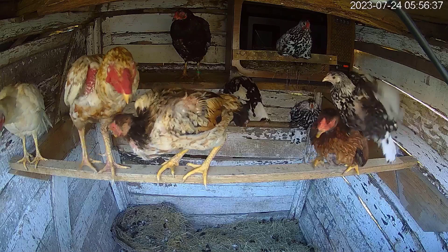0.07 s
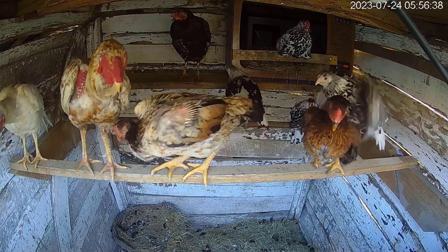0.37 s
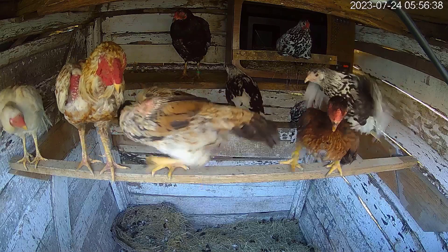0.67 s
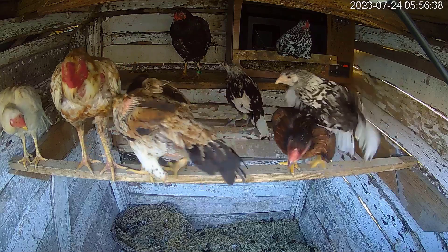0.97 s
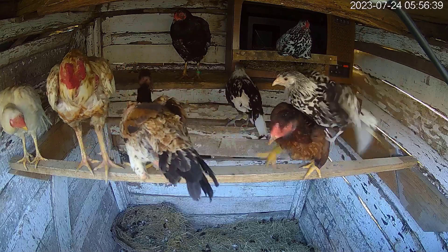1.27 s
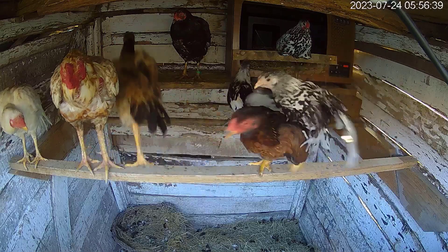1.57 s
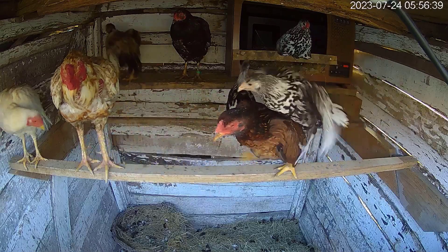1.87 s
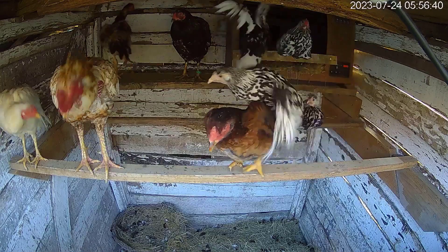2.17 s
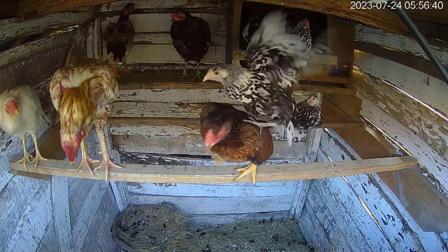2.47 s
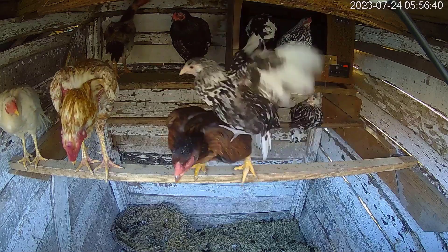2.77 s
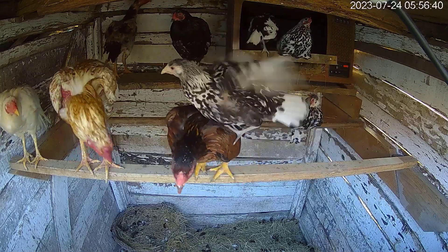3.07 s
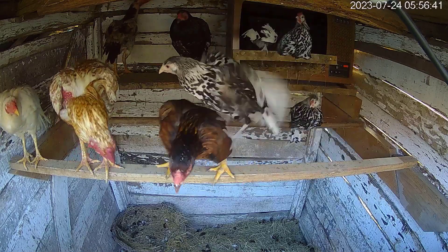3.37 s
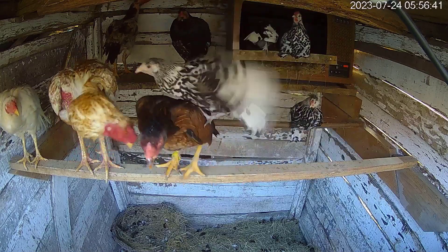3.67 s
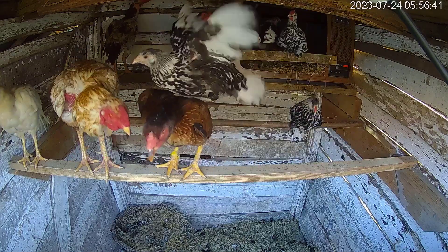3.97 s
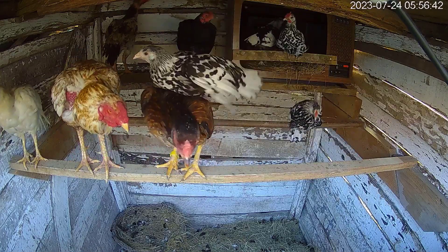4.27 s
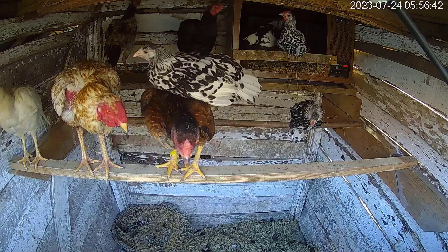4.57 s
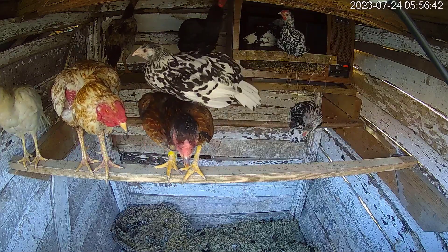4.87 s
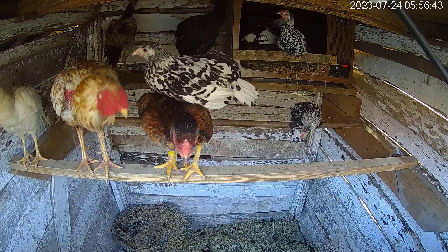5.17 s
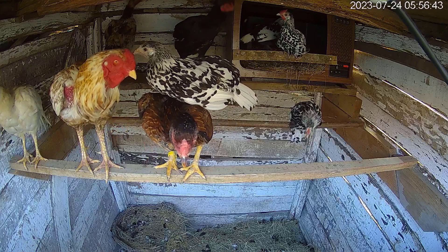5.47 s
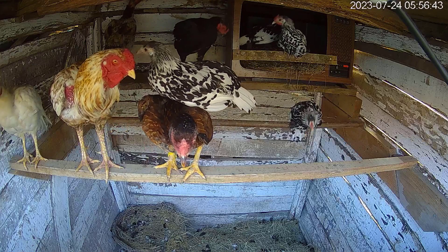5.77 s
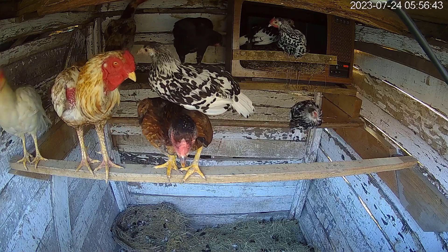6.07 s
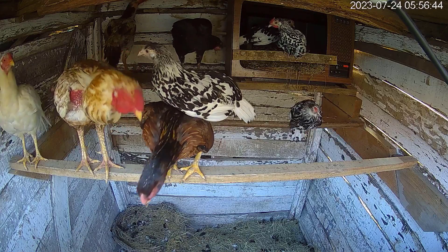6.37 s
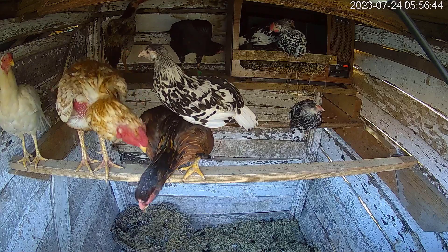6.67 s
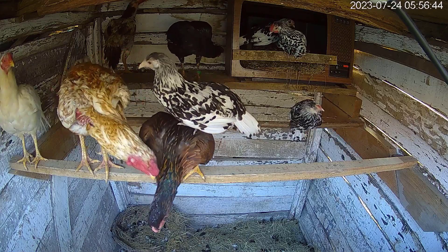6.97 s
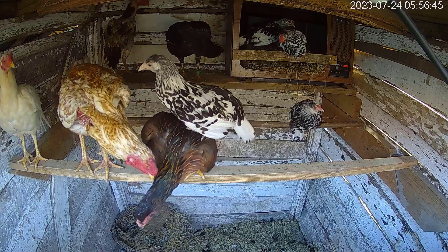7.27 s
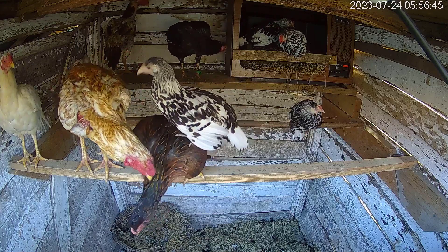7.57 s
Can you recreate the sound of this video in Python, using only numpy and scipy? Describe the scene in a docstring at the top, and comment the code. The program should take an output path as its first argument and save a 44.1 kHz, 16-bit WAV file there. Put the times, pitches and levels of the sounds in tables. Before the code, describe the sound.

Hens scuffle in a small wooden coop, flapping wings and knocking on a perch, with short clucks, one long squawk and soft whines.

```python
"""Feathers rustle, a foot knocks on a perch and a hen clucks: a scuffle in a small wooden coop.
One hen climbs onto another's back; her wings clap and swish, and their draught buffets a small microphone.
Claws and feet ring the wood. Clucks are syrinx pulses ringing the throat. The hen underneath protests
with soft whines and one long squawk, a high tone swept by a fast trill. Two thin squeaks slip in."""
import sys
import numpy as np
from scipy import signal
from scipy.fft import rfft, irfft
from scipy.io import wavfile

SR = 44100
rng = np.random.default_rng(int(sys.argv[2]) if len(sys.argv) > 2 else 0)


def int16_out(signal):
    """Quantize to a 16-bit WAV file."""
    q = np.round(np.clip(np.atleast_2d(signal).T, -1, 1) * 32767)
    wavfile.write(sys.argv[1], SR, q.astype(np.int16))


N = 336042
T = np.arange(N) / SR
FIRM_CALL_DB = -30   # reference for pitch, trill rate and brightness


def from_db(db):
    """Decibels to gain."""
    return 10 ** (np.asarray(db) / 20)


def rms_one(x):
    """Scale to unit rms."""
    return x / np.sqrt(np.mean(x ** 2) + 1e-20)


def wobble(t, per_s):
    """Random wander, spread about 1, per_s turns a second."""
    steps = rng.standard_normal(len(t))
    return np.interp((t - t[0]) * per_s, np.arange(len(t)), steps)


def coloured(x, spectrum, tilt_db_per_oct=0, ripple_db=0):
    """Filter by a spectrum with steep skirts, a tilt above 1 kHz and random ripple."""
    f = np.maximum(np.fft.rfftfreq(len(x), 1 / SR), 1)
    hz, db = np.transpose(spectrum)
    outside_oct = np.abs(np.log2(f / np.clip(f, hz[0], hz[-1])))
    db = np.interp(np.log(f), np.log(hz), db) - 24 * outside_oct
    db = db + tilt_db_per_oct * np.log2(np.maximum(f / 1000, 1)) + ripple_db * wobble(f, 1 / 190)
    return irfft(rfft(x) * from_db(db), len(x))


def noise(spectrum, size=N):
    """Coloured noise, unit rms."""
    return rms_one(coloured(rng.standard_normal(size), spectrum))


def resonance(x, hz, width_hz):
    """Two-pole resonance, unit peak gain."""
    r = np.exp(-np.pi * width_hz / SR)
    poles = [1, -2 * r * np.cos(2 * np.pi * hz / SR), r * r]
    return signal.lfilter(np.array([1, 0, -1]) * (1 - r * r) / 2, poles, x)


def ring(x, modes):
    """Parallel resonances."""
    return sum(from_db(db) * resonance(x, hz, width_hz) for hz, width_hz, db in modes)


def butter(x, order, hz, kind="low"):
    """Butterworth filter."""
    return signal.sosfilt(signal.butter(order, hz, kind, fs=SR, output="sos"), x)


def swell(peak_s, rise_s, fall_s, rounding_s=0):
    """Times and exponential envelope around a peak; rounding the top keeps the energy."""
    t = np.arange(-SR // 8, SR // 4) / SR
    span_s = np.maximum(np.where(t < 0, rise_s, fall_s), 1e-4)
    pointed = np.exp(-np.abs(t) / span_s)
    rounded = np.exp((rounding_s - np.hypot(t, rounding_s)) / span_s)
    return peak_s + t, rounded * np.linalg.norm(pointed) / np.linalg.norm(rounded)


def add(track, t, sound):
    """Mix a sound into the track at times t."""
    at = round(t[0] * SR) + np.arange(len(t))
    inside = (at >= 0) & (at < N)
    track[at[inside]] += sound[inside]


# vanes sliding over each other: (frequency [Hz], level [dB])
FEATHER_SPECTRUM = [(200, -27), (600, -9.5), (1100, -7.5), (1800, -0.5), (2600, -4), (3400, 0.5),
                    (4500, -2), (5800, 5.5), (7200, -5.5)]
# loose feathers: (time [s], level [dB])
RUSTLE_LEVELS = [(0, -58.5), (.9, -57), (1.1, -54.5), (2.2, -56.5), (2.9, -60), (3.3, -70), (3.9, -51),
                 (4.4, -86)]
def rustle(clump_db=7.5, clumps_per_s=22, flick_db=8, flicks_per_s=300):
    """Loose feathers flick against each other in random clumps."""
    flicks = rms_one(from_db(clump_db * wobble(T, clumps_per_s) + flick_db * wobble(T, flicks_per_s)))
    vanes = coloured(flicks * rng.standard_normal(N), FEATHER_SPECTRUM, tilt_db_per_oct=13)
    return from_db(np.interp(T, *np.transpose(RUSTLE_LEVELS))) * rms_one(vanes)


# stirred air: (time [s], level [dB])
DRAUGHT_LEVELS = [(0.0, -51), (0.1, -46), (1.65, -40), (2.9, -46.5), (3.15, -58.5), (7.37, -65), (7.6, -44)]
# its rumble: (frequency [Hz], level [dB])
DRAUGHT_SPECTRUM = [(20, 8), (33, -2), (48, -13.5), (70, -15), (130, -23.5), (260, -30.5)]
def draught():
    """Slow air from the wings rumbles on the microphone."""
    return from_db(np.interp(T, *np.transpose(DRAUGHT_LEVELS))) * noise(DRAUGHT_SPECTRUM)


# noise floor: (frequency [Hz], level [dB])
HISS_SPECTRUM = [(41, -32.5), (70, -6.5), (477, -7), (1060, -11.5), (2950, -12), (7200, -14)]
def hiss(level_db=-63.5):
    """Steady microphone noise."""
    return from_db(level_db) * noise(HISS_SPECTRUM)


# perch and boards: (frequency [Hz], width [Hz], gain [dB])
PERCH_MODES = [(130, 45, -4), (242, 39, -3.5), (312, 20, 1.5), (539, 17, 12.5), (610, 25, -4.5),
               (783, 28, 0), (1150, 42, 1.5), (1300, 110, -4)]
# shifting claws: (time [s], level [dB])
SHUFFLE_LEVELS = [(0, -64), (1.75, -60), (2.5, -62), (3.3, -76)]
def shuffle(clump_db=6, clumps_per_s=25, scratch_db=-15):
    """Claws scrape in uneven clumps and keep the wood ringing softly."""
    scrapes = rng.standard_normal(N) * from_db(clump_db * wobble(T, clumps_per_s))
    wood = ring(scrapes, PERCH_MODES) + from_db(scratch_db) * resonance(scrapes, 1300, 1800)
    return from_db(np.interp(T, *np.transpose(SHUFFLE_LEVELS))) * rms_one(wood)


# feet and bodies: (time [s], level [dB], twice the skid's fall [s], hardness [Hz], place on perch [0-1])
PERCH_KNOCKS = [(0.054, -42, 0.018, 1380, 0.29), (.21, -34, 0.024, 600, 0.44),
                (0.694, -42.5, 0.019, 280, 0.3), (0.91, -42, 0.023, 500, 0.26),
                (1.01, -44, 0.014, 1900, .21), (1.229, -28, 0.022, 610, .27),
                (1.242, -35, 0.087, 504, 0.37), (1.947, -21.5, 0.012, 1800, 0.23),
                (1.9597, -22, 0.0029, 700, 0.23), (1.975, -36.5, 0.018, 260, 0),
                (2.045, -32.5, 0.015, 1500, 0.24), (2.441, -41, 0.037, 400, 0.32),
                (2.883, -32, 0.012, 980, 0.17), (2.971, -55.5, 0.031, 280, .27),
                (4.998, -39.5, 0.0068, 1400, 0.12), (5.329, -58.5, 0.03, 420, 0.26),
                (5.5, -32.5, 0.0053, 740, 0.21), (5.788, -53.5, .018, 600, .21),
                (7.393, -42, 0.018, 1097, 0.37), (7.506, -42.5, 0.015, 2500, 0.5),
                (7.531, -44.5, 0.019, 400, 0.06)]
def knocks(scuff_db=5, all_skid_db=-41.5, blow_per_db=0.32, spread_db=2, thud_db=-13):
    """A foot skids, quiet ones with a single blow too; the place struck weights the wood's modes."""
    out = np.zeros(N)
    for peak_s, db, length_s, hardness_hz, place in PERCH_KNOCKS:
        t, envelope = swell(peak_s, rise_s=0.0041, fall_s=length_s / 2)
        skid = envelope * rng.standard_normal(len(t)) * from_db(scuff_db * wobble(t, 600))
        blow_share = np.clip(blow_per_db * (all_skid_db - db), 0, 0.5)
        blow = envelope == envelope.max()
        contacts = (1 - blow_share) * skid / np.linalg.norm(skid) + blow_share * blow
        contacts = butter(contacts, 2, hardness_hz)
        wood = from_db(thud_db) * resonance(contacts, 300, 600)
        for k, (hz, width_hz, mode_db) in enumerate(PERCH_MODES, 1):
            gain = np.sin(k * np.pi * place) * from_db(mode_db + spread_db * rng.standard_normal())
            wood += gain * resonance(contacts, hz, width_hz)
        add(out, t, from_db(db) * rms_one(wood) * np.sqrt(length_s * SR / len(t)))
    return out


# clucks: (time [s], level [dB], fall [s], lower formant [Hz], upper formant [Hz], upper gain [dB])
CLUCK_CALLS = [(0.126, -29.5, 0.015, 490, 1300, -1.5), (0.238, -29, 0.014, 503, 1090, -5),
               (0.718, -29.5, 0.0098, 516, 800, -1.5), (1.165, -32.5, 0.012, 567, 920, -3),
               (1.308, -31, 0.043, 476, 693, 6), (1.541, -26.5, 0.014, 497, 984, 3),
               (1.62, -27, 0.015, 570, 1312, -6), (2.57, -25, 0.01, 540, 957, -0.5),
               (2.669, -30.5, 0.014, 468, 850, 0.5), (2.881, -23.5, 0.014, 535, 926, -6),
               (3.059, -26.5, 0.013, 370, 850, 6), (3.12, -32.5, 0.0082, 505, 924, -4),
               (3.57, -32.5, 0.015, 847, 1330, -21), (5.516, -35, 0.012, 572, 885, 5),
               (6.227, -48, 0.0052, 873, 1202, 0.5), (6.72, -40.5, 0.0098, 524, 1030, 5)]
def clucks(firm_hz=276.1, hz_per_db=2.5, jitter=0.0791, shimmer_db=3, air=0.11, beak_db=-26, bend=0.048):
    """Uneven syrinx pulses ring the chest, two throat formants and, faintly, the beak."""
    out = np.zeros(N)
    for peak_s, db, fall_s, lower_hz, upper_hz, upper_db in CLUCK_CALLS:
        t, envelope = swell(peak_s, 0.52 * fall_s, fall_s)
        pitch_hz = firm_hz + hz_per_db * (db - FIRM_CALL_DB)
        cycles = np.cumsum(pitch_hz * (1 + jitter * wobble(t, pitch_hz))) / SR
        pulses = np.diff(np.floor(cycles), prepend=0) * from_db(shimmer_db * wobble(t, pitch_hz))
        syrinx = pulses + air * rng.standard_normal(len(t))
        throat = resonance(syrinx, lower_hz, 95) - from_db(upper_db) * resonance(syrinx, upper_hz, 110)
        chest_db = -13 - 7.5 * np.log2(lower_hz / 520)   # tight, high throat: quiet chest
        chest = from_db(chest_db) * resonance(syrinx, pitch_hz, 95)
        beak_hz = 2550 * np.exp(rng.standard_normal() / 10)
        voice = butter(throat - chest, 4, 1500) + from_db(beak_db) * resonance(syrinx, beak_hz, 290)
        # the opening beak bends the whole sound upward
        bent_s = t + 2 * bend * fall_s * np.log(np.cosh((t - peak_s) / (2 * fall_s)))
        add(out, t, from_db(db) * envelope * rms_one(np.interp(bent_s, t, voice)))
    return out


def stroke(t, tilt_db_per_oct, flutter_db=1, quills_per_s=520, snag_db=4.5, snags_per_s=130):
    """A run of tiny flicks passes between two feather groups, each with its own resonances."""
    flicks = rms_one(from_db(flutter_db * wobble(t, quills_per_s) + snag_db * wobble(t, snags_per_s)))
    groups = []
    for _ in range(2):
        friction = flicks * rng.standard_normal(len(t))
        groups.append(rms_one(coloured(friction, FEATHER_SPECTRUM, tilt_db_per_oct, ripple_db=6)))
    blend_rad = wobble(t, 70) / 2
    return np.cos(blend_rad) * groups[0] + np.sin(blend_rad) * groups[1]


# wings snap open or strike a body: (time [s], relative level [dB], fall [s], tilt [dB/octave])
WING_CLAPS = [(0.166, -20.5, 0.013, 1), (0.182, -21, 0.003, 2), (0.206, -28.5, 0.0098, -1),
              (0.335, -43, 0.022, 4), (0.483, -34, 0.044, -4), (0.896, -27.5, 0.0088, 7.5),
              (1.213, -17.5, 0.0057, -2), (1.523, -34, 0.018, 0.5), (1.725, -31, 0.017, -5),
              (1.783, -22.5, 0.0046, 7), (1.873, -30, 0.0055, 7), (2.039, -25, 0.011, -2.5),
              (2.143, -25, 0.011, 4.5), (2.336, -21, 0.014, -1), (2.764, -24.5, 0.015, 6.5),
              (3.545, -30.5, 0.0075, 5), (3.812, -30.5, 0.022, -4.5), (4.067, -25, 0.0086, -8.5),
              (4.124, -24.5, 0.0025, -8), (4.144, -23, 0.0023, -3.5), (7.508, -40, 0.0064, -5.5)]
# wings brush past: (time [s], relative level [dB], fall [s], tilt [dB/octave])
WING_SWISHES = [(0.519, -28, 0.0092, 0.5), (0.583, -29.5, 0.0033, 5.5), (0.67, -38.5, 0.017, 23.5),
                (0.851, -25.5, 0.018, 0), (1.221, -30.5, 0.017, -12.5), (1.255, -32, 0.018, 4),
                (1.465, -41, 0.012, -12), (1.824, -28, 0.0075, 2.5), (1.943, -21, 0.0041, -4),
                (2.091, -32, 0.0099, 2), (2.377, -32.5, 0.029, -5), (2.474, -27, 0.0062, 14),
                (2.712, -26, 0.0099, 4.5), (3.063, -36, 0.015, -2.5), (3.128, -36.5, 0.0025, 4.5),
                (3.843, -20.5, 0.011, -3), (3.897, -31, 0.005, -7), (5.49, -36, 0.0043, -5),
                (7.108, -48.5, 0.039, -6), (7.457, -33, 0.0088, 1)]
# shared feather resonances: (frequency [Hz], width [Hz], gain [dB])
WING_MODES = [(2460, 160, 5), (3245, 92, 0), (4050, 94, -1)]
def wings(gain_db=-1):
    """Sudden claps and swelling swishes over the rustle; all excite the same narrow resonances."""
    out = rustle()
    for peak_s, db, fall_s, tilt_db_per_oct in WING_CLAPS:
        t, envelope = swell(peak_s, 0.0018, fall_s)
        add(out, t, from_db(db) * envelope * stroke(t, tilt_db_per_oct))
    for peak_s, db, fall_s, tilt_db_per_oct in WING_SWISHES:
        t, envelope = swell(peak_s, 0.82 * fall_s, fall_s, rounding_s=0.004)
        add(out, t, from_db(db) * envelope * stroke(t, tilt_db_per_oct))
    return from_db(gain_db) * butter(out + ring(out, WING_MODES), 2, 300, "high")


# wing gusts: (time [s], level [dB])
GUST_PEAKS = [(0.297, -43.5), (0.963, -39), (1.277, -35.5), (1.574, -32.5), (1.694, -37), (1.839, -34.5),
              (1.998, -40)]
# their buffeting: (frequency [Hz], level [dB])
GUST_SPECTRUM = [(30, 14.5), (60, -19.5), (130, 3), (200, -9.5), (400, -26), (800, -26.5)]
def gusts():
    """Air hits the microphone directly, reaching higher in pitch than the draught."""
    out = np.zeros(N)
    for peak_s, db in GUST_PEAKS:
        t, envelope = swell(peak_s, rise_s=0.042, fall_s=0.041)
        add(out, t, from_db(db) * envelope * noise(GUST_SPECTRUM, len(t)))
    return out


CRY_ATTACK_S, CRY_RELEASE_S = 0.00697, 0.0056
def cry_gate(start_s, end_s):
    """Times and attack-hold-release envelope of a cry."""
    t = start_s + np.arange(SR * 3 // 4) / SR
    return t, np.clip(np.minimum((t - start_s) / CRY_ATTACK_S, (end_s - t) / CRY_RELEASE_S), 0, 1)


# harmonics from the second up: (relative level [dB])
CRY_OVERTONES_DB = [-17.5, -22.5, -47]
# air through the syrinx: (frequency [Hz], level [dB])
BREATH_SPECTRUM = [(1500, -1), (2000, -4.5), (3000, -6), (4300, -8), (6500, -16)]
def cry(t, pitch_hz, db, depth, rasp, overtones_db, throb,
        trill_hz=54.5, jitter=0.034, shimmer=0.28, smear_rad=0.55, rasp_per_s=660, breath_db=-22):
    """A high tone swept by a fast, uneven trill; a rasping syrinx roughens and doubles its period."""
    effort_db = db - FIRM_CALL_DB
    sweep_hz = (trill_hz - 0.5 * effort_db) * (1 + 0.046 * wobble(t, trill_hz))
    trill_rad = 2 * np.pi * (np.cumsum(sweep_hz) / SR - trill_hz * CRY_ATTACK_S)
    sweep = np.tanh(1.15 * np.sin(trill_rad) + 0.33 * wobble(t, 2 * trill_hz))   # dwells at each end
    phase = 2 * np.pi * np.cumsum(pitch_hz * (1 + depth * sweep + jitter * wobble(t, 700))) / SR
    edge = from_db(overtones_db + 0.64 * np.minimum(effort_db, 0))   # softer is purer
    overtones = sum(from_db(level_db) * np.sin(k * phase + smear_rad * wobble(t, rasp_per_s))
                    for k, level_db in enumerate(CRY_OVERTONES_DB, 2))
    tone = np.sin(phase) + edge * overtones
    tone *= 1 + shimmer * wobble(t, 250) + 0.3 * rasp * wobble(t, rasp_per_s)
    subharmonic = from_db(-2) * np.sin(phase / 2)
    half_harmonics = from_db(-17) * edge * (np.sin(1.5 * phase) + np.sin(2.5 * phase))
    tone += rasp * (subharmonic + half_harmonics)
    tone *= 1 + throb * (1 - rasp) * np.tanh(20 * depth) * np.cos(trill_rad)   # a clear voice pulses
    tone += edge * from_db(breath_db) * noise(BREATH_SPECTRUM, len(t))
    return from_db(db + 2 * wobble(t, trill_hz)) * np.sqrt(2) * tone


# throat and open beak: (frequency [Hz], gain [dB])
OPEN_THROAT = [(400, -13.5), (600, -0.5), (900, 0.5), (1150, 0.5), (1500, 4), (2050, 2.5), (2600, -6),
               (3700, 3), (4250, 1), (5200, -4)]
# short cries: (start [s], length [s], level [dB], fade [dB], first pitch [Hz], last pitch [Hz],
# trill depth [share of pitch], rasp [0-1], overtone gain [dB])
WHINE_CALLS = [(0.494, 0.13, -37.5, 3.5, 880, 883, 0.17, 1, -12),
               (2.363, 0.11, -36.5, 6.5, 1082, 802, 0.22, 0.93, 7),
               (3.567, 0.074, -45.5, 22, 1370, 1465, 0.01, 0.84, 16.5),
               (3.692, 0.092, -52, -6, 1363, 1193, 0.034, 0.24, 17.5),
               (5.007, 0.045, -42, 2.5, 1516, 810, 0.12, 0.73, 3),
               (5.082, 0.059, -36.5, 3, 980, 1322, 0.13, 0.3, -10),
               (5.139, 0.071, -39.5, 0, 865, 1220, 0.16, 0.18, -10),
               (5.206, 0.055, -32.5, 16.5, 977, 897, 0.14, 0.12, -10),
               (5.818, 0.036, -36, -4, 818, 832, 0.017, 0.1, -14.5),
               (5.845, 0.037, -49.5, 7, 1060, 1283, 0.052, 0, -1),
               (6.971, 0.042, -46.5, -2.5, 1073, 1110, 0.072, 0, 4.5),
               (7.101, 0.045, -32, -1, 1310, 1220, 0.18, 0, 5),
               (7.141, 0.029, -36.5, 4, 1278, 1260, 0.12, 0, 10),
               (7.175, 0.11, -37, 21.5, 1260, 1134, 0.11, 0, 12.5),
               (7.391, 0.068, -45.5, 1.5, 1450, 1000, 0.08, 0.33, 15.5)]
def whines():
    """Short cries through the open throat, gliding evenly in pitch and level."""
    out = np.zeros(N)
    for start_s, length_s, db, fade_db, first_hz, last_hz, depth, rasp, overtones_db in WHINE_CALLS:
        t, gate = cry_gate(start_s, start_s + length_s)
        progress = np.minimum((t - start_s) / length_s, 1)
        pitch_hz = first_hz + (last_hz - first_hz) * progress
        add(out, t, gate * cry(t, pitch_hz, db - fade_db * progress, depth, rasp, overtones_db, 0.75))
    return coloured(out, OPEN_THROAT)


# thin squeaks: (time [s], level [dB], pitch [Hz])
SQUEAK_PEAKS = [(0.731, -44.5, 3800), (1.912, -40.5, 4230)]
def squeaks(sag_hz_per_s=5000, jitter=0.026):
    """Brief, unsteady high tones that sag."""
    out = np.zeros(N)
    for peak_s, db, hz in SQUEAK_PEAKS:
        t, envelope = swell(peak_s, rise_s=0.003, fall_s=0.013)
        pitch_hz = (hz - sag_hz_per_s * (t - peak_s)) * (1 + jitter * wobble(t, 870))
        add(out, t, from_db(db) * envelope * np.sin(2 * np.pi * np.cumsum(pitch_hz) / SR))
    return out


# effort: (time [s], relative level [dB])
SQUAWK_EFFORT = [(3.745, -47.5), (3.767, -31), (3.89, -31), (3.965, -30.5), (3.992, -28.5), (4.025, -28),
                 (4.055, -21.5), (4.072, -17), (4.108, -24), (4.127, -20), (4.147, -17), (4.175, -21.5),
                 (4.225, -28.5), (4.299, -37.5), (4.335, -69)]
# the voice breaks, then clears:
# (time [s], trill depth [share of pitch], rasp [0-1], overtone gain [dB], throat pinch [0-1])
SQUAWK_TIMBRE = [(3.78, .26, .2, 1, .6), (3.88, .27, .3, 1, .8), (3.93, .27, .8, 2, 1),
                 (3.99, .3, .3, 2, 1), (4.05, .26, .75, 0, .6), (4.135, .22, .65, -1, .3),
                 (4.16, .22, .2, 2, 0), (4.3, .18, .15, 4, 0)]
# pinched throat: (frequency [Hz], width per stage [Hz], gain [dB])
NASAL_FORMANTS = [(800, 445, 3), (1400, 290, 4.5), (2900, 360, 9.5), (4300, 840, 7.5)]
def squawk(gain_db=-1, firm_hz=1135, hz_per_db=9):
    """One long protest: effort sets level and pitch as the throat goes from pinched to open."""
    out = np.zeros(N)
    t, gate = cry_gate(SQUAWK_EFFORT[0][0], SQUAWK_EFFORT[-1][0])
    db = np.interp(t, *np.transpose(SQUAWK_EFFORT)) + gain_db
    pitch_hz = firm_hz + hz_per_db * np.maximum(db - FIRM_CALL_DB, -6)
    times_s, *columns = np.transpose(SQUAWK_TIMBRE)
    depth, rasp, overtones_db, pinch = [np.interp(t, times_s, column) for column in columns]
    syrinx = gate * cry(t, pitch_hz, db, depth, rasp, overtones_db, throb=0.5 * (1 - pinch))
    nasal = sum(from_db(peak_db) * resonance(resonance(syrinx, hz, width_hz), hz, width_hz)
                for hz, width_hz, peak_db in NASAL_FORMANTS)
    add(out, t, pinch * nasal + (1 - pinch) * coloured(syrinx, OPEN_THROAT))
    return out


def cut_cry_bass(x, cutoff_hz=480):
    """Cries carry no bass: a steep cut below about 480 Hz."""
    return butter(x, 4, cutoff_hz, "high")


# nearest walls and roof: (delay [s], gain [dB])
WALL_ECHOES = [(.0026, -15), (.0047, -16), (.0083, -13.5)]
# hollow of the coop: (frequency [Hz], width [Hz], gain [dB])
COOP_MODES = [(312, 26, -10), (528, 53, -5.5)]
def coop(x, t60_s=0.077, tail_db=-11, build_s=0.0094):
    """Close boards give early echoes, a short diffuse tail and a hollow ring."""
    t = T[:SR // 3]
    tail = rng.standard_normal(len(t)) * from_db(-60 * t / t60_s) * (1 - np.exp(-t / build_s))
    response = from_db(tail_db) * tail / np.linalg.norm(tail)
    response[0] += 1
    for delay_s, db in WALL_ECHOES:
        response[round(delay_s * SR)] += from_db(db)
    response += ring(response, COOP_MODES)
    return signal.fftconvolve(x, response / np.linalg.norm(response))[:N]


def scene():
    """Birds and perch sound in the coop; wind and hiss arise at the microphone."""
    scuffle = wings() + clucks() + cut_cry_bass(whines() + squawk()) + squeaks() + knocks() + shuffle()
    return (coop(scuffle) + draught() + gusts() + hiss())[None]


def record(dry, cutoff_hz=7250):
    """Narrow-band microphone: steep treble cut."""
    return signal.sosfilt(signal.ellip(10, 0.3, 75, cutoff_hz, fs=SR, output="sos"), dry)


dry = scene()
out = record(dry)
int16_out(out)
```